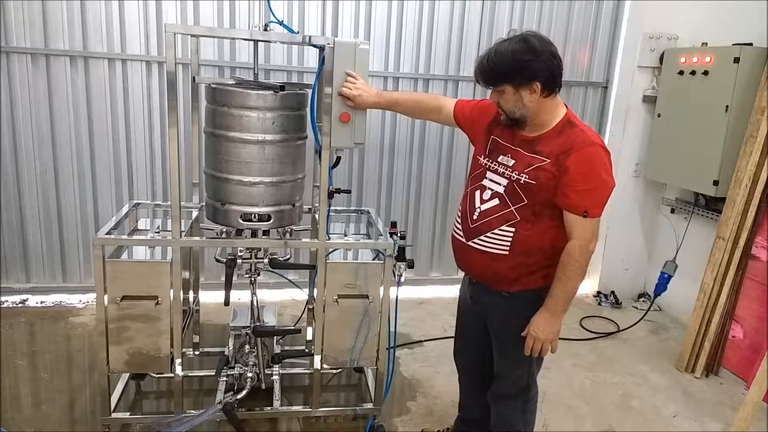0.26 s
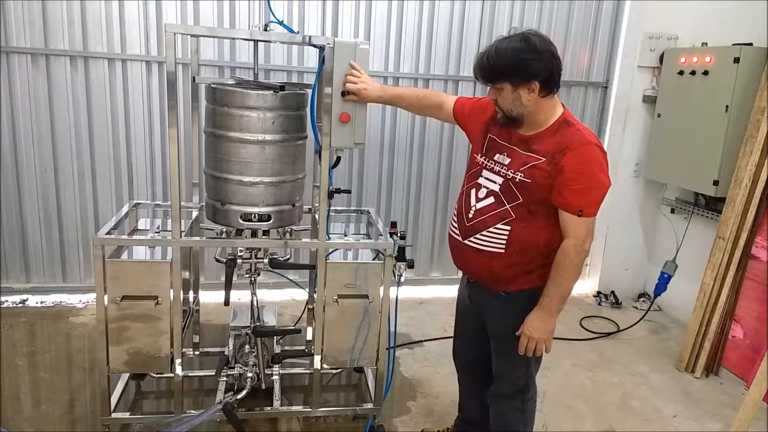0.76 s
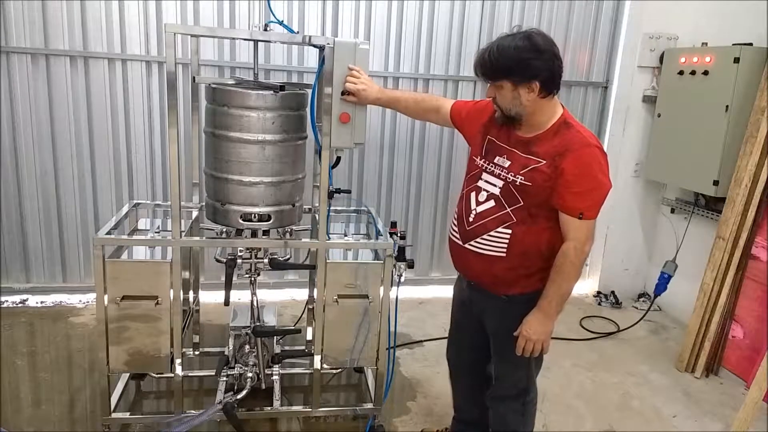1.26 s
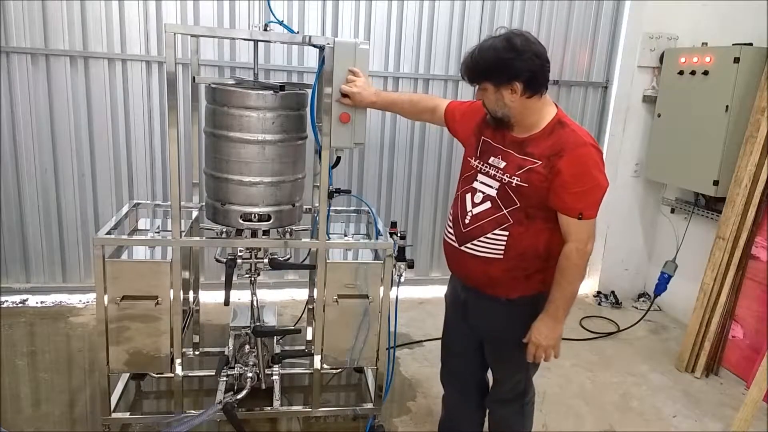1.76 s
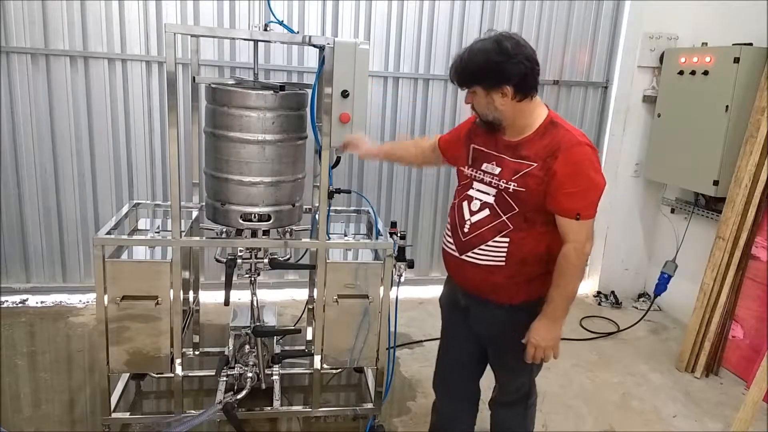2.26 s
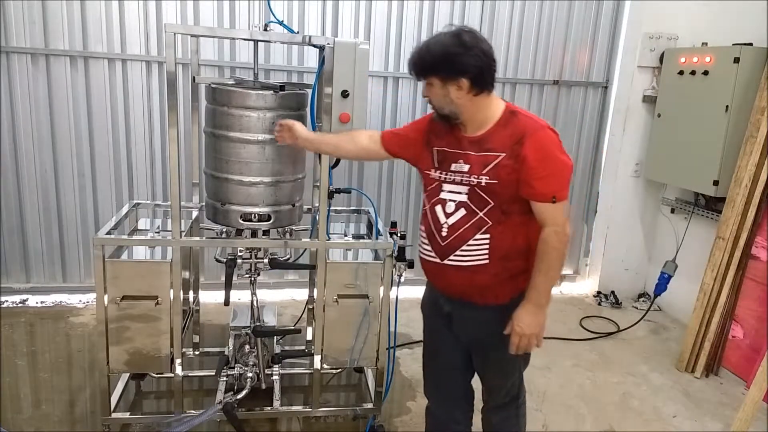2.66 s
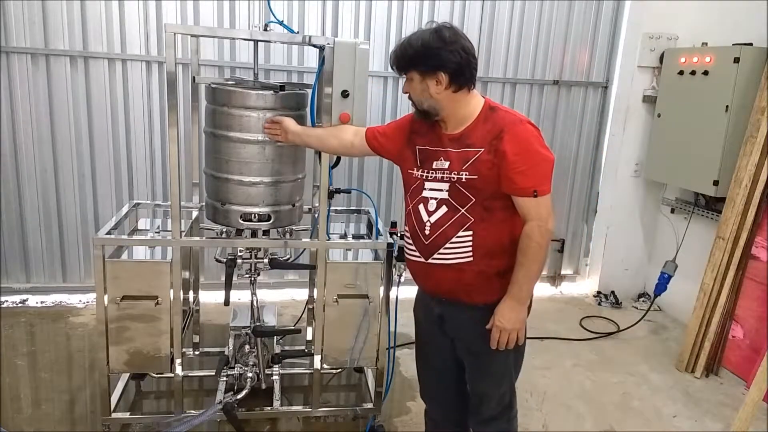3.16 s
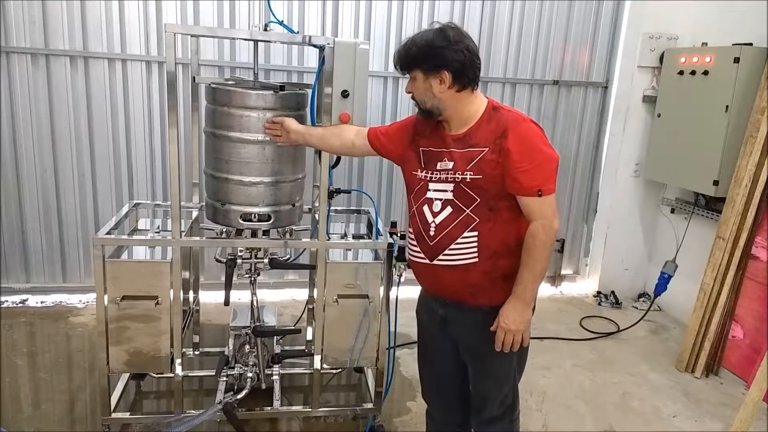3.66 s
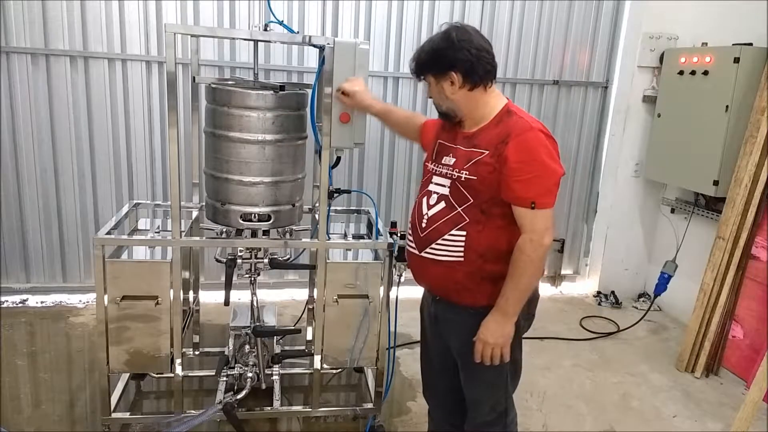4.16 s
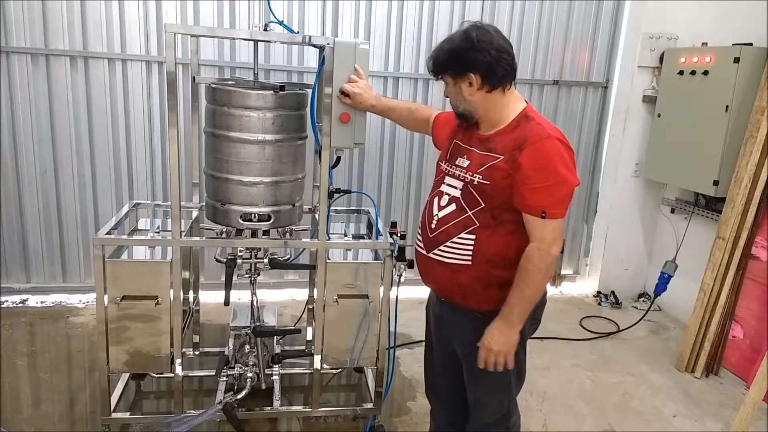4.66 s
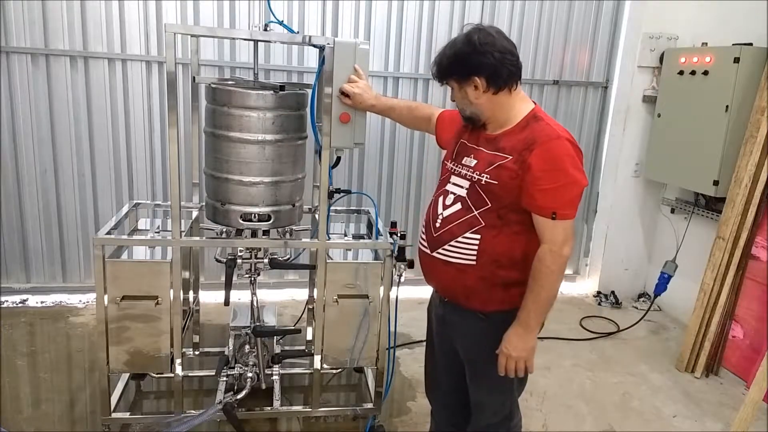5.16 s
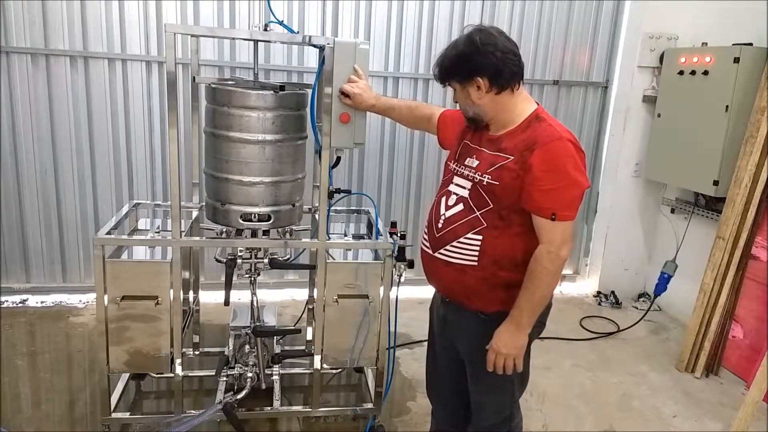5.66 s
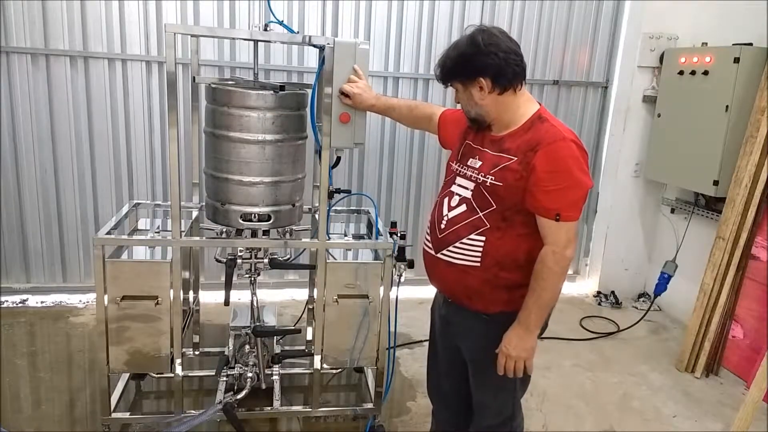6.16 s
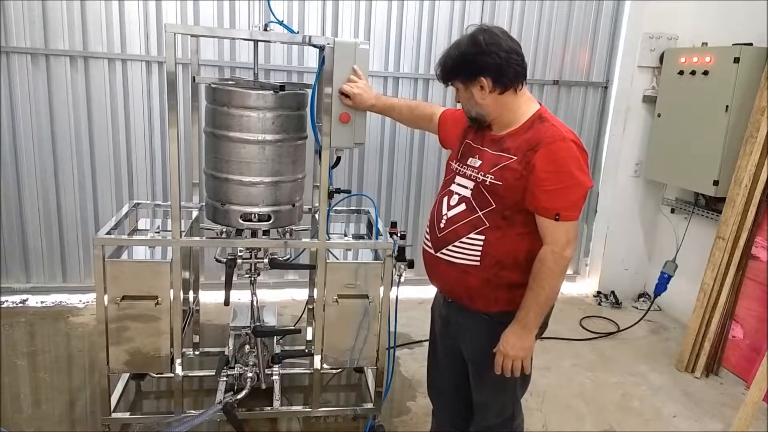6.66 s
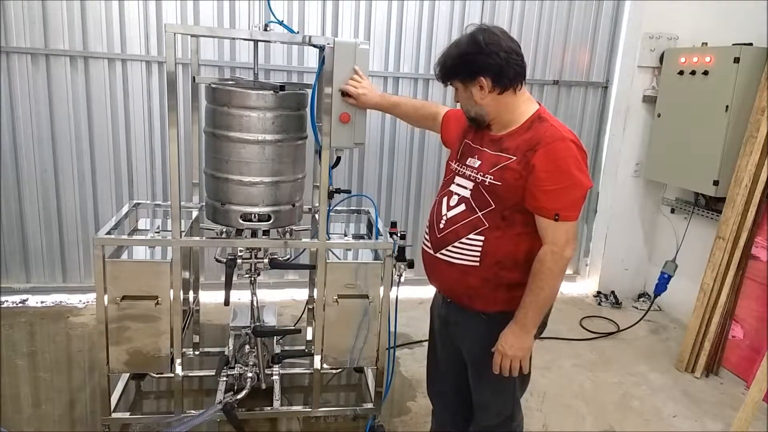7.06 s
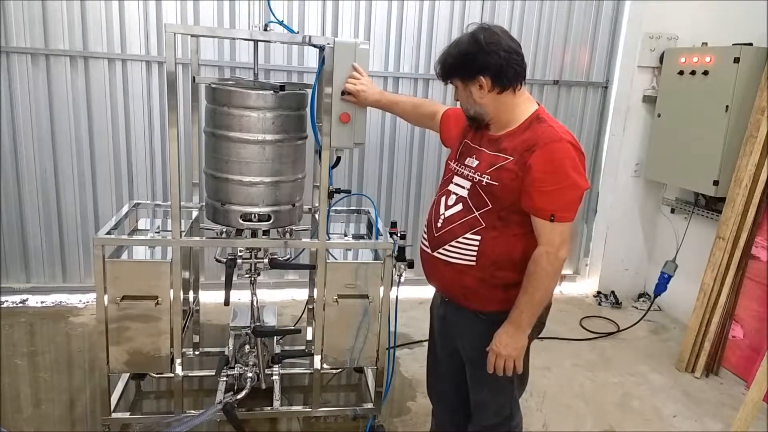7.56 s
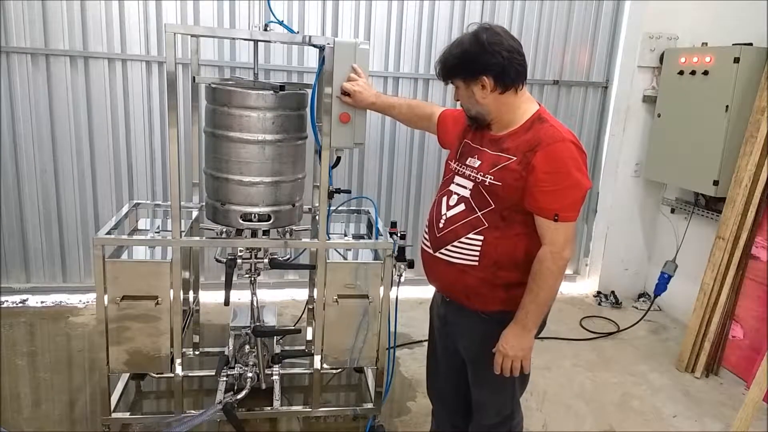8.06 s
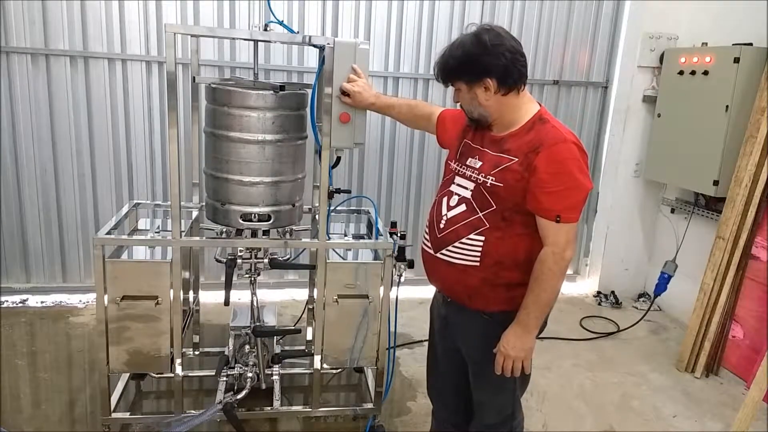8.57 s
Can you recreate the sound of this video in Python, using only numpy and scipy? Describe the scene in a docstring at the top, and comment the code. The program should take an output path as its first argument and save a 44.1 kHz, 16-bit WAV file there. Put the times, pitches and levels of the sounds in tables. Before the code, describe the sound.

A pump is already running, liquid hissing through a steel keg in a reverberant metal shed. At 0.14 s a contactor clacks dully; the hum falls away and the rush sags into a softer, lower draining wash with thin singing gurgles. At 0.77 s a sharper double clack restarts the motor; hum returns about 0.1 s later, and at 1.1 s a slug of liquid strikes the keg wall. Small gurgles bubble as the flow swells to full by about 2.3 s. Until 6.8 s it stays dense and steady: broadband spray, metallic ringing around 3 to 5 kHz, 120 Hz hum with higher motor tones, and a fluttering 1.8 kHz whine. At 6.81 s it clacks off and drains again; clicks at 7.48 s restart it, spray bursts back at 7.7 s, bubbling, and rises to full near 8.8 s.

```python
"""Hissing liquid and a humming motor are heard first: an electric pump drives hot liquid through a steel keg
in a sheet-metal workshop. Filtered noise makes the rush, its wash around the shed, and the ring of the keg wall;
narrow resonances make passing gurgles, wavering sines the motor and impeller. Twice a contactor, made of short
decaying modes, clacks off, the flow sags and drains, and it clacks on again."""
import sys
import numpy as np
from scipy import signal
from scipy.fft import rfft, irfft, next_fast_len
from scipy.io import wavfile

SR = 44100
rng = np.random.default_rng(int(sys.argv[2]) if len(sys.argv) > 2 else 0)


def inscribe(sig):
    """Save sig as 16-bit PCM at rate SR to the path in sys.argv[1].

    A 1-D sig is mono; a 2-D sig holds one channel per row.
    Samples are clipped to [-1, 1] before scaling.
    """
    pcm = np.round(np.clip(np.atleast_2d(sig).T, -1, 1) * 32767)
    wavfile.write(sys.argv[1], SR, pcm.astype(np.int16))


N = 388962   # length [samples]


def amp(db):
    """Gain of a level in dB."""
    return 10 ** (np.asarray(db) / 20)


def rms_one(x):
    """Scaled to unit rms."""
    return x / np.sqrt(np.mean(x ** 2) + 1e-20)


def at_hz(points, hz):
    """A spectrum table read on a log-frequency axis."""
    points = np.array(points)
    return np.interp(np.log(hz + 1), np.log(points[:, 0]), points[:, 1])


def curve(points):
    """A level table joined by straight lines in time."""
    s, level_db = np.transpose(points)
    return np.interp(np.arange(N) / SR, s, level_db)


def frequency_grid():
    """Transform size and the frequency of each of its bins."""
    size = next_fast_len(N)
    return size, np.arange(size // 2 + 1) * SR / size


def drift(rate):
    """Slow chance of spread 1, changing about rate times a second: noise through a two-pole lowpass."""
    step = 40   # computed on every 40th sample, then joined by lines
    r = np.exp(-2 * step * np.pi * rate / SR)
    noise = rng.standard_normal(N // step + 2002)
    slow = signal.lfilter([1], [1, -2 * r, r * r], noise)[2000:]   # drop the filter's start-up
    return np.interp(np.arange(N) / step, np.arange(len(slow)), rms_one(slow))


def resonate(noise, hz, width):
    """One resonance of gain 1 at its top."""
    r = np.exp(-np.pi * width / SR)
    poles = [1, -2 * r * np.cos(2 * np.pi * hz / SR), r * r]
    return signal.lfilter([(1 - r * r) / 2, 0, (r * r - 1) / 2], poles, noise)


# pump stops: (off [s], on [s], jet back [s])
STOPS = [(0.13, 0.777, 1.1), (6.794, 7.495, 7.71)]


def keg_draining(t):
    """Draining, 0 to 1, builds after each stop and fades once the pump is switched on."""
    rise_s, fade_s = 0.34, 0.068
    return sum(np.clip(np.minimum((t - off) / rise_s, (on - t) / fade_s + 1), 0, 1)
               for off, on, back in STOPS)


# strength of the flow before each source takes its share: (time [s], level [dB])
FLOW = [(0, -30), (.14, -28.5), (.4, -37.5), (.75, -45.5), (.8, -39.5), (.95, -46.5), (.97, -41),
        (1.12, -39), (1.4, -41.5), (1.55, -36), (2.0, -31), (2.4, -29), (2.76, -31), (3.1, -29.5),
        (3.95, -30), (4.1, -32), (4.2, -29), (4.7, -29.5), (5.3, -30.5), (6.82, -29.5), (7.02, -37.5),
        (7.47, -39.5), (7.52, -37.5), (7.68, -44.5), (7.73, -39.5), (8.0, -38), (8.82, -29.5)]


def flow_sag():
    """The flow relative to full flow in dB, negative while it sags."""
    full_flow_db = -30
    return curve(FLOW) - full_flow_db


# left-right likeness before the phase swing: (frequency [Hz], likeness [0-1])
LIKENESS = [(30, 0), (110, 0.85), (250, 0.6), (500, 0.6), (1000, 0.82), (1900, .88), (2050, .5),
            (2200, .72), (2330, .985), (2450, .999), (2560, .95), (2650, .82), (2950, .88), (3650, .86),
            (5000, 0.76), (7000, 0.43), (13000, 0.68)]
# left over right: (frequency [Hz], level difference [dB])
BALANCE = [(100, -1.5), (350, 3.5), (800, -0.5), (1900, -2.5), (2150, 1), (2400, -3.1), (2800, -1),
           (5500, -1.6), (8800, 2), (14000, -2.5)]


def stereo(near, other, colour=None):
    """Stereo spread: with rising pitch the channels swing in and out of phase."""
    opposed_hz, turn_hz = 2390, 2580   # first pitch at which the channels are opposed; Hz per full phase turn
    one_sided = 0.19   # amplitude share of the side signal that is the near sound, a quarter cycle off
    size, hz = frequency_grid()
    turn = np.maximum(np.pi + 2 * np.pi * (hz - opposed_hz) / turn_hz, 0)
    swing = np.tanh(1.2 * np.cos(turn)) / np.tanh(1.2)   # a cosine with flattened tops
    alike = at_hz(LIKENESS, hz) * swing
    near, other = rfft(near, size), rfft(other, size)
    side = one_sided * 1j * np.sign(np.sin(turn)) * near + np.sqrt(1 - one_sided ** 2) * other
    both = np.sqrt((1 + alike) / 2) * near + np.sqrt((1 - alike) / 2) * side * [[1], [-1]]
    both = both * amp(at_hz(BALANCE, hz) * [[.5], [-.5]])
    if colour is not None:
        both = both * amp(at_hz(colour, hz))
    return irfft(both, size)[:, :N]


# colour of the liquid noise, before its layers are levelled: (frequency [Hz], density [dB per Hz])
LIQUID = [(25, -34), (60, -29), (100, -1.5), (170, -8), (300, -5.5), (600, -2.5), (1000, -3.5),
          (1450, -7.5), (1900, -4.5), (2120, -2), (2230, -7.5), (2370, -9.5), (2520, -5.5), (2700, -2),
          (3000, -6), (4400, -6), (4850, -3.5), (6200, -6), (8200, -3), (10500, -8.5), (12500, -19),
          (15000, -19.5)]


def liquid_noise():
    """Turbulence: random pressure coloured by the liquid's spectrum."""
    return stereo(*rng.standard_normal((2, N)), LIQUID)


# wall and pipe resonances, over the liquid noise before the jet level:
# (frequency [Hz], width [Hz], level [dB])
KEG = [(212, 14, 8), (232, 12, 6), (330, 16, 4), (362, 16, 12), (378, 14, 10), (468, 8, 8), (788, 12, 7),
       (817, 12, 5), (1190, 40, 3), (1270, 90, 5), (1823, 40, 2), (1885, 10, 10), (1915, 12, 10.5),
       (2127, 14, 5.5), (2460, 14, 2), (2741, 14, 7.5), (2783, 25, 7), (2992, 20, 6), (3100, 20, 6),
       (3150, 20, 8), (3184, 14, 12), (3295, 12, 10), (3376, 10, 7), (3424, 10, 10), (3520, 30, 8),
       (3564, 24, 14), (3849, 14, 8.5), (3877, 12, 8), (3977, 12, 11), (4021, 12, 8.5), (4170, 60, 5),
       (4318, 24, 9), (4342, 18, 14.5), (4487, 12, 12), (4515, 20, 7.5), (4590, 30, 5), (4653, 12, 9),
       (5017, 25, 8), (5430, 16, 6), (5545, 26, 10), (5854, 18, 6), (6546, 60, 6), (6920, 50, 4),
       (7055, 50, 4), (7990, 25, 8), (8190, 100, 5), (8613, 90, 5), (11560, 140, 4)]


def keg_wall(waver_db):
    """Turbulence excites each wall resonance, whose strength wanders on its own."""
    noise, out = liquid_noise(), 0
    for k, (hz, width, level_db) in enumerate(KEG):
        level_db = level_db + waver_db * drift(3.1) + 1.67 * drift(12)
        out = out + (-1) ** k * amp(level_db) * resonate(noise, hz, width)
    return out


def jet_level(t, sag_db, draining):
    """The jet strikes the wall with the flow, hardest just as it comes back, less while the keg drains."""
    jet_db, follows, drain_db = -2, 0.28, -1   # follows: share of the flow's sag
    slug_db, slug_fade_s = 7, 0.17   # first slug when the jet is back
    slugs = sum((t > back) * np.exp(-np.maximum(t - back, 0) / slug_fade_s) for off, on, back in STOPS)
    return jet_db + follows * sag_db + drain_db * draining + slug_db * slugs


def fine_modes(hz, spacing_hz, depth_db):
    """Countless small modes of steel and shed ripple the spectrum at random, more so in the treble."""
    ripple = np.interp(hz / spacing_hz, np.arange(2000), rng.standard_normal(2000))
    return amp(depth_db * ripple * np.clip(hz / 3000, 0, 1))


# pipe rumble, rush, spray, fine hiss:
# (level at full flow [dB], share of the flow's sag [ratio], added while draining [dB])
LAYERS = [(-40.5, 0.98, 6.5), (-36.5, 0.7, 3.5), (-30.5, 1.124, 0.5), (-37.5, 1.22, -2.5)]
# crossovers between those four layers: (frequency [Hz])
LAYER_EDGES_HZ = [650, 1600, 6000]


def liquid(sag_db, draining, jet_db):
    """Smooth rush plus ringing wall, in four ranges that swell and sag with the flow and flutter a little."""
    sound = liquid_noise() + amp(jet_db) * keg_wall(waver_db=1.7)
    size, hz = frequency_grid()
    above = [.5 + .5 * np.tanh(np.log2((hz + 1) / edge) / 0.26) for edge in LAYER_EDGES_HZ]
    above = [1] + above + [0]
    spectrum = rfft(sound, size) * fine_modes(hz, spacing_hz=14, depth_db=1.5)
    surge, out = drift(7.9), 0   # one surge shared by all layers
    for k, (full_db, share, drain_db) in enumerate(LAYERS):
        layer = irfft(spectrum * (above[k] - above[k + 1]), size)[:, :N]
        layer = layer / np.std(layer.mean(axis=0))
        level_db = full_db + share * sag_db + drain_db * draining
        out = out + amp(level_db + 0.73 * surge + 0.78 * drift(22)) * layer
    return out


# colour of running water heard from all sides of the shed, before levelling:
# (frequency [Hz], density [dB per Hz])
SHED = [(25, -18), (60, -3), (180, 1.5), (700, -1), (2050, -2.5), (2400, -8), (2800, -0.5), (4400, -1),
        (6500, -30), (12000, -16)]


def shed(draining):
    """Reflected wash, unrelated in the two channels, fuller while the keg drains."""
    level_db, drain_db = -46, 5.5
    size, hz = frequency_grid()
    spectrum = rfft(rng.standard_normal((2, N)), size) * amp(at_hz(SHED, hz))
    wash = irfft(spectrum, size)[:, :N]
    return amp(level_db + drain_db * draining + 1.5 * drift(5.0)) * rms_one(wash)


# passing narrow notes, in the lulls and during full flow; the rows near 360 Hz swell the motor's 360 Hz tone: #
# (start [s], end [s], frequency [Hz], width [Hz], level [dB])
GURGLE = [(-.02, 0.098, 358, 24, -33), (.05, 0.74, 2756, 16, -44), (.5, .65, 3570, 30, -51),
          (2.97, 3.05, 735, 90, -37), (0.962, 0.974, 1175, 200, -35), (1.497, 2.552, 365.4, 16, -45),
          (1.03, 1.174, 3570, 34, -40.5), (1.066, 1.196, 780, 17, -45), (1.53, 1.8, 1287, 40, -43),
          (1.54, 1.74, 1175, 90, -40), (1.695, 1.766, 1093, 44, -41), (1.516, 2.49, 790, 13, -44.5),
          (4.247, 5.6, 211.5, 24, -45), (6.947, 7.49, 202, 47, -48), (7.05, 7.475, 1646, 22, -47),
          (7.194, 7.488, 3980, 160, -41.5), (7.94, 8.02, 1184, 70, -42), (7.98, 8.182, 1210, 110, -40),
          (8.148, 8.33, 1130, 65, -42), (8.27, 8.416, 1245, 110, -39)]


def gurgle(t):
    """Trapped air pockets sing for a moment on the turbulence; the rows near 360 Hz instead make the motor's
    360 Hz tone swell for a while."""
    noise, out = stereo(*rng.standard_normal((2, N))), 0
    for start, end, hz, width, level_db in GURGLE:
        rise = (t - start) / (.15 * (end - start))
        fall = (end - t) / .02 + 1   # fades in 20 ms after the end
        gate = np.clip(np.minimum(rise, fall), 0, 1)
        note = resonate(resonate(noise, hz, width), hz, width)
        out = out + amp(level_db + 2.0 * drift(16)) * gate * rms_one(note)
    return out


def hum_level(t, sag_db):
    """The hum drops after each stop, returns soon after switching on and then creeps up to full."""
    running_db, follows = -39, 0.29   # follows: share of the flow's sag
    coast_s, fall_db_per_s, off_db = 0.092, 108, -15.5   # after switching off
    lag_s, rise_db_per_s, back_db, recover_db_per_s = 0.096, 160, -8, 7   # after switching on
    out = running_db + follows * sag_db
    for off, on, back in STOPS:
        since = t - on - lag_s
        falling = np.maximum(-fall_db_per_s * np.maximum(t - off - coast_s, 0), off_db)
        rising = np.minimum(off_db + rise_db_per_s * since, back_db + recover_db_per_s * since)
        out = out + np.minimum(np.maximum(falling, rising), 0)
    return out


# motor tones, mains multiples and rotor-slot tones spaced by twice the mains:
# (frequency [Hz], level relative to the hum [dB], wavering [dB])
MOTOR = [(120, 0, .6), (360.5, -16, 4), (716, -17, 3), (840.2, -11, 2.5), (902.6, -3.5, 1.2),
         (960.2, -13, 3), (1022.7, -15, 3), (1080.6, -12, 3.5), (1142.8, -8, 2.5), (1262.8, -10.5, 2.5)]


def motor(t, hum_db):
    """Mains and rotor-slot forces hum as steady sines, each wavering by its own amount."""
    out = 0
    for hz, level_db, spread_db in MOTOR:
        waver_db = spread_db * drift(3.0)
        # the low hum is a little out of step left to right [cycles]
        lead = np.array([[.06], [-.06]]) if hz < 200 else 0
        out = out + amp(level_db + waver_db) * np.sin(2 * np.pi * (hz * t + rng.random() + lead))
    return np.sqrt(2) * amp(hum_db) * out * amp([[-.9], [.9]])


# impeller whine before its flutter and left-right balance: (time [s], level [dB])
WHINE = [(0.0, -47), (0.05, -52), (0.17, -34.5), (0.34, -47), (0.91, -58), (1.15, -44), (1.33, -57),
         (1.62, -42), (1.79, -58), (2.01, -44), (2.09, -33), (2.23, -46), (2.36, -29.5), (2.48, -51),
         (2.63, -28), (2.77, -45), (2.92, -37.5), (3.19, -30.5), (3.29, -42), (3.56, -35), (3.66, -45),
         (3.73, -28), (3.88, -37), (3.98, -30), (4.07, -44), (4.2, -33.5), (4.54, -40), (4.69, -28),
         (5.21, -47), (5.43, -35), (5.55, -48), (5.92, -37), (6.26, -45), (6.53, -35.5), (6.78, -50),
         (6.83, -43), (6.97, -56), (7.44, -60), (7.49, -51), (7.61, -64), (7.79, -41), (7.84, -50),
         (8.47, -54), (8.82, -34)]


def impeller(t):
    """The impeller's narrow whine: one sine with a wobbling phase and a fluttering level."""
    whine_hz = 1825
    wobble = .16 * drift(6.0)   # phase [cycles]
    lead = np.array([[.12], [-.12]])   # between the channels [cycles]
    whine = np.sin(2 * np.pi * (whine_hz * t + wobble + lead)) * amp([[-1.5], [1.5]])
    return np.sqrt(2) * amp(curve(WHINE) + 2.0 * drift(15.0)) * whine


# contactor blows, before the mode levels: (time [s], thud level [dB], tick level [dB])
BLOWS = [(.137, -13, -30), (.1475, -20, -35), (.7659, -15, -40), (.767, -15, -40), (.7679, -26, -15),
         (.7711, -25, -12), (.7759, -19, -24), (6.8088, -20, -40), (6.8098, -16, -30), (6.8157, -11, -22),
         (6.8208, -15, -28), (6.8278, -20, -35), (7.452, -27, -40), (7.4795, -24, -40), (7.4815, -21, -30),
         (7.4833, -24, -22), (7.4868, -22, -13), (7.4915, -19, -17), (7.501, -27, -35), (7.522, -26, -35)]
# cabinet modes, relative to each thud: (frequency [Hz], level [dB], t60 [s])
THUD = [(985, -4, .028), (1250, -13, .016), (820, -9, .035), (1650, -13, .012), (520, -20, .02)]
# contact modes, relative to each tick: (frequency [Hz], level [dB], t60 [s])
TICK = [(2000, -13, .006), (3500, -6, .006), (4300, -11, .005), (5900, -9, .005), (6800, -12, .004),
        (8600, 0, .005), (11700, -5, .003), (14000, -8, .003)]


def contactor():
    """Each blow rings the cabinet and the contacts; the shed answers with a short noisy tail."""
    echo_db, echo_t60_s = -14, .4
    s, thud_db, tick_db = np.transpose(BLOWS)
    dry = np.zeros(N)
    for modes, blow_db in ((THUD, thud_db), (TICK, tick_db)):
        for k, (hz, level_db, t60) in enumerate(modes):
            clicks = np.full(N, 1e-18)   # a trace of input keeps the filter from stalling on tiny numbers
            clicks[(s * SR).astype(int)] = amp(blow_db + level_db + rng.normal(0, 0.28, len(s)))
            r, w = amp(-60 / (t60 * SR)), 2 * np.pi * hz / SR
            ring = signal.lfilter([0, np.sin(w)], [1, -2 * r * np.cos(w), r * r], clicks)
            dry += (-1) ** k * ring
    # a small cabinet radiates no bass
    dry = signal.sosfilt(signal.butter(2, 300, "high", fs=SR, output="sos"), dry)
    t = np.arange(SR // 2) / SR
    tail = rng.standard_normal((2, len(t))) * amp(-60 * t / echo_t60_s) * (t > .008)
    tail = amp(echo_db) * rms_one(tail) / np.sqrt(len(t))
    wet = signal.fftconvolve(dry[None], tail, axes=1)[:, :N]
    return np.array([dry, np.roll(dry, 1)]) + wet   # the right channel is one sample later


def scene():
    """Liquid, shed, gurgles, motor, impeller and contactor on one timeline of flow and stops."""
    t = np.arange(N) / SR
    sag_db, draining = flow_sag(), keg_draining(t)
    water = liquid(sag_db, draining, jet_level(t, sag_db, draining)) + shed(draining) + gurgle(t)
    pump = motor(t, hum_level(t, sag_db)) + impeller(t)
    return water + pump + contactor()


def record(dry):
    """The microphone adds a faint bright hiss; the top is cut steeply."""
    hiss_db, hiss_from_hz, cutoff_hz = -63.5, 4900, 15450   # hiss level before its highpass
    bright = signal.butter(2, hiss_from_hz, "high", fs=SR, output="sos")
    hiss = signal.sosfilt(bright, rng.standard_normal((2, N)))
    top_cut = signal.cheby2(16, 60, cutoff_hz, fs=SR, output="sos")
    return signal.sosfilt(top_cut, dry + amp(hiss_db) * hiss)


dry = scene()
out = record(dry)
inscribe(out)
```